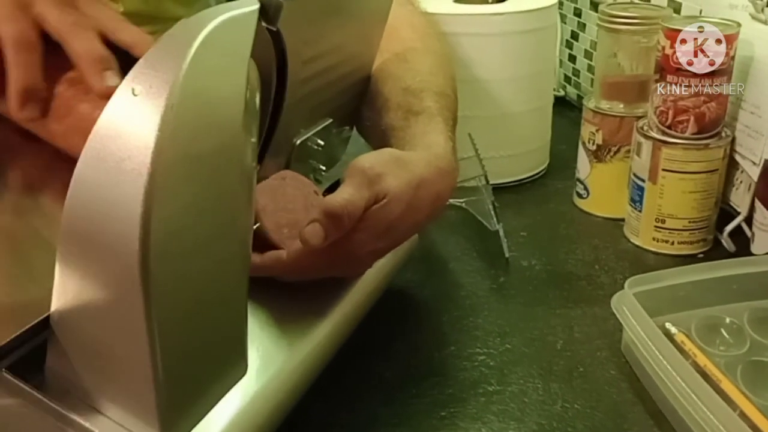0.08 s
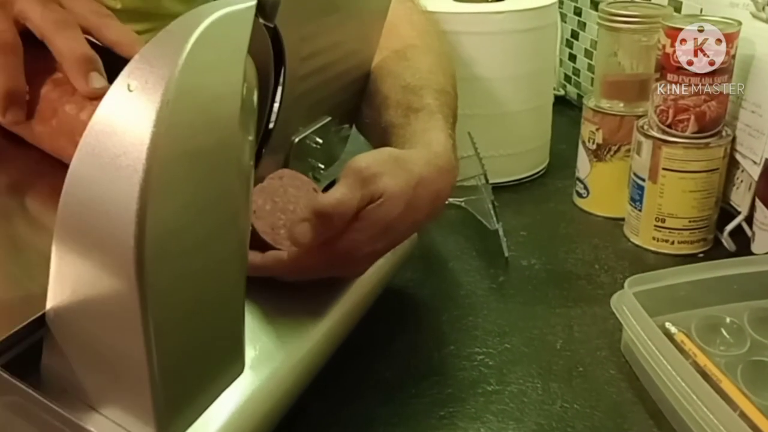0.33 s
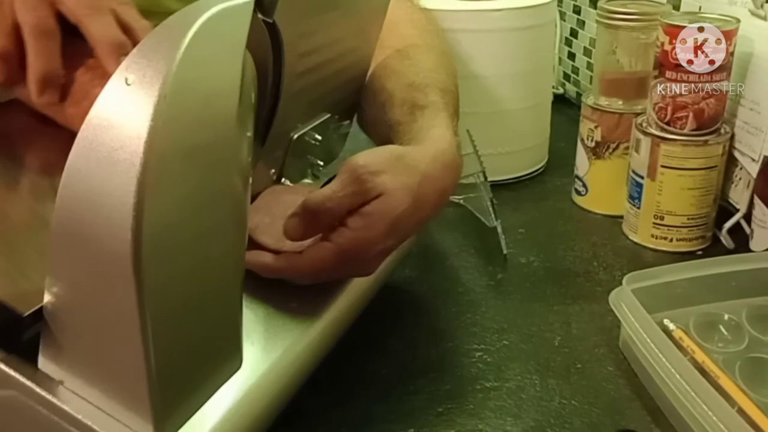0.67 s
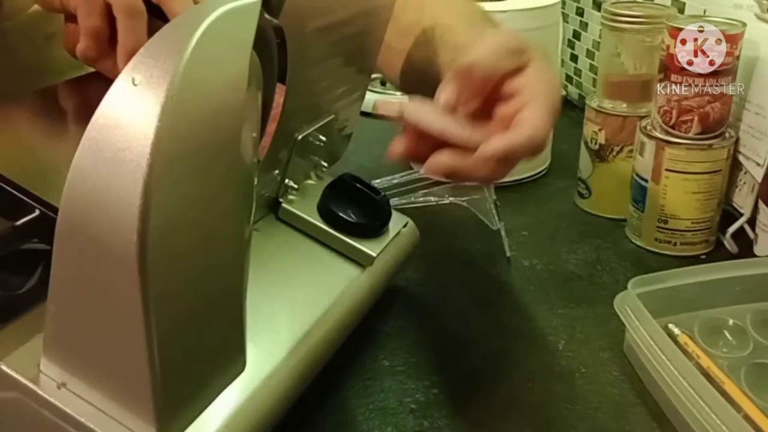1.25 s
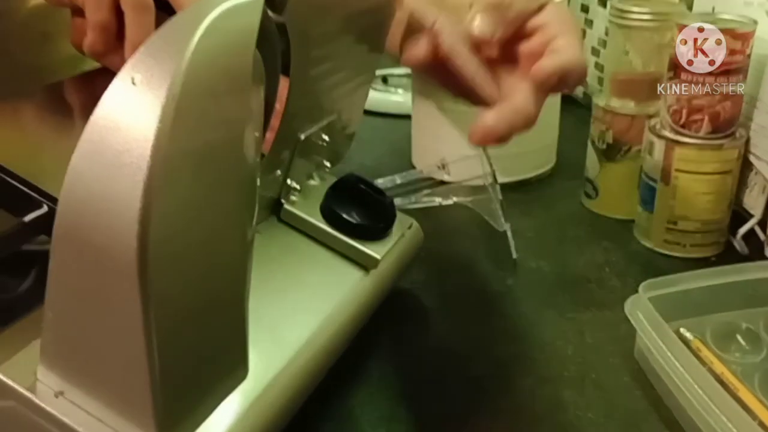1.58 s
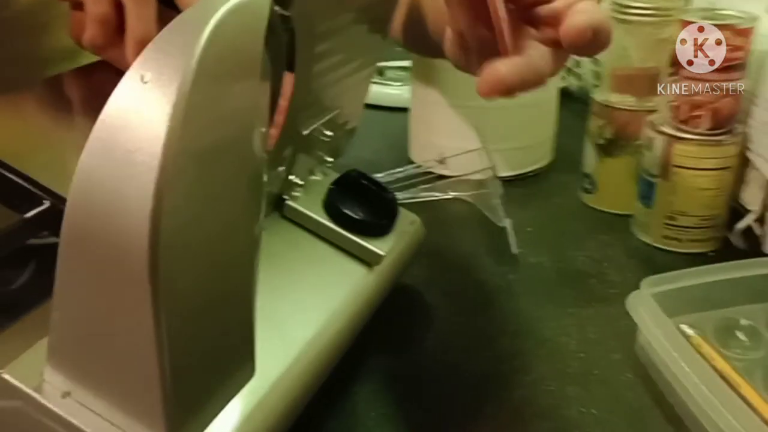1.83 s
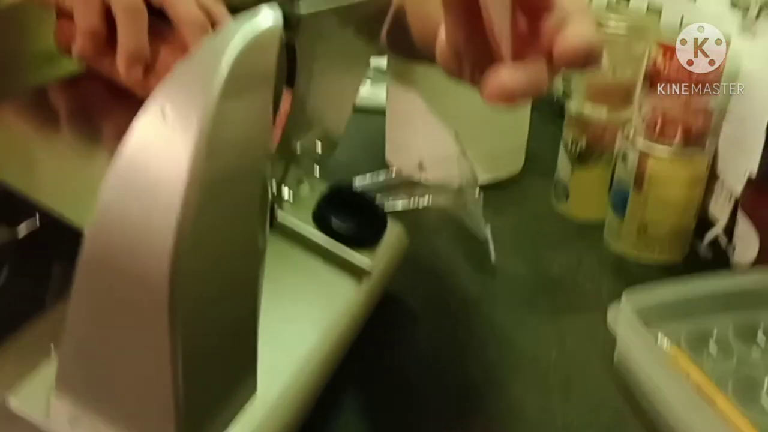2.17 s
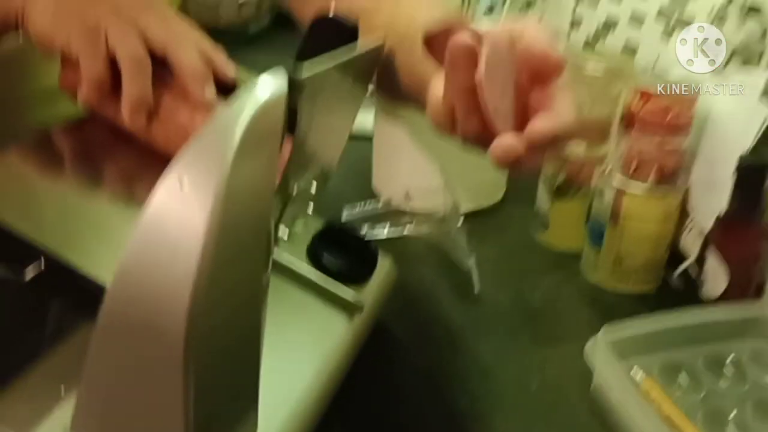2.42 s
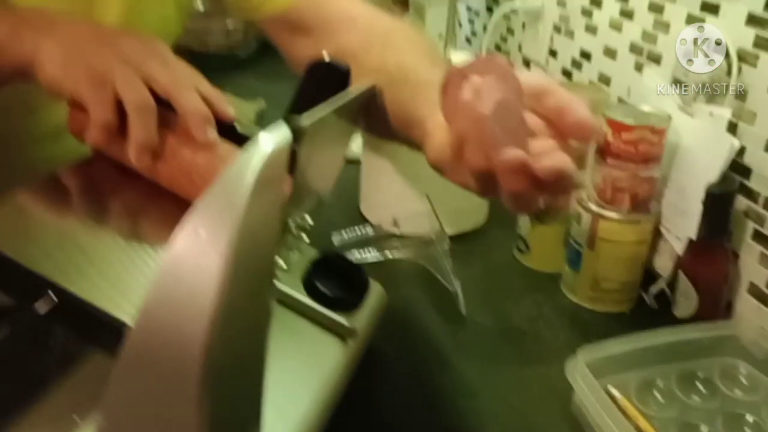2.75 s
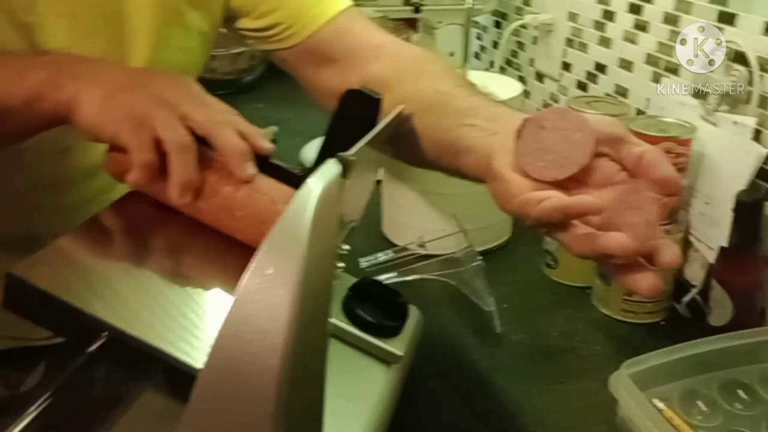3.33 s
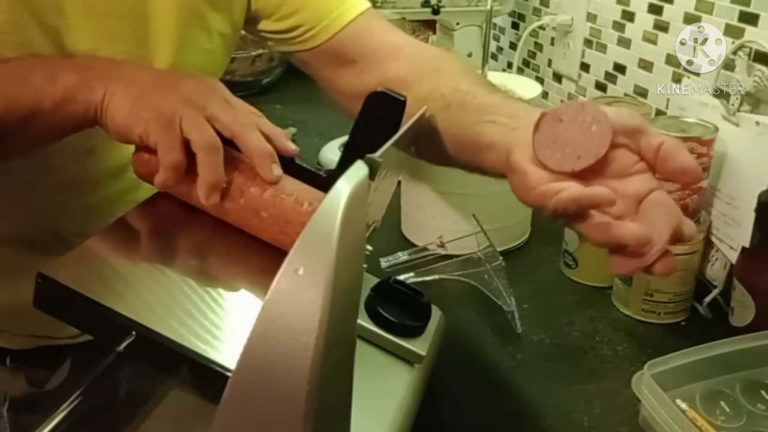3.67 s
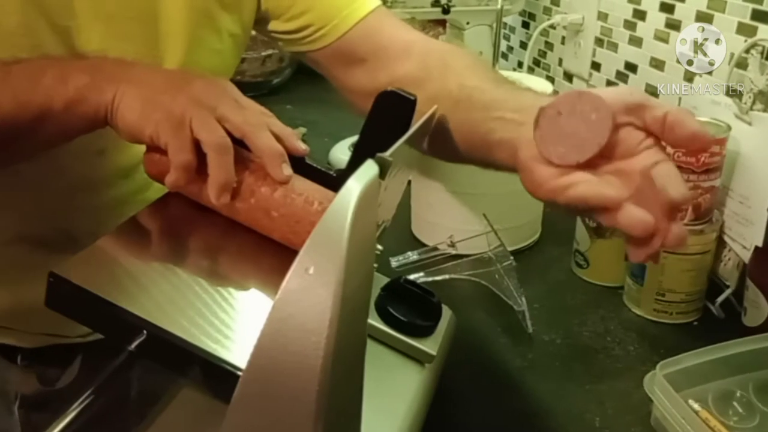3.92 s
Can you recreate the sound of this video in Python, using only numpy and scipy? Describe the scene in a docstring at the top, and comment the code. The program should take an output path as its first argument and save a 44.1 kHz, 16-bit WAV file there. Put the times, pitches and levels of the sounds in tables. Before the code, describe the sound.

An electric meat slicer is already running close by, with a buzzing motor whine, droning, rattling gears and a hissing, ringing blade. During the first second it cuts a slice of sausage, and the motor drags with a stronger hum. Its pitch rises slightly as it runs free. The sound cuts out for an instant at about 1.2 seconds, then the slicer whines on steadily until 4 seconds.

```python
"""An electric meat slicer on a kitchen counter, heard from close by through one microphone.
It is already running: the fast motor whines and buzzes with the mains, the gearing drones and rattles,
the spinning blade hisses and rings. During the first second a slice of sausage is cut, and the motor
drags and hums, then speeds up as it runs free. At 1.2 s the sound cuts out very briefly; after that
the machine whines on to the end."""
import sys
import numpy as np
from scipy import signal
from scipy.fft import rfft, irfft
from scipy.io import wavfile
from scipy.ndimage import map_coordinates

SR = 44100
rng = np.random.default_rng(int(sys.argv[2]) if len(sys.argv) > 2 else 0)


def generate_wav(signal):
    """Clip the signal to [-1, 1] and save it as 16-bit WAV at the path in sys.argv[1]."""
    frames = np.transpose(np.atleast_2d(signal))
    scaled = np.clip(frames, -1, 1) * 32767
    pcm = np.round(scaled).astype(np.int16)
    wavfile.write(sys.argv[1], SR, pcm)


N = 176400
TIME_S = np.arange(N) / SR
MAINS_HZ, GEAR_RATIO = 60, 40
# slow cycles of the drive: motor_turns_per_cycle, one_swell_at_s
BEAT_CYCLE, GEAR_CYCLE, BLADE_CYCLE = (83.06, 2.565), (40.16, 2.503), (251, 2.93)


def from_db(db):
    """Decibels to gain."""
    return 10 ** (np.asarray(db) / 20)


def in_time(rows):
    """A curve's value at every sample."""
    return np.interp(TIME_S, *np.transpose(rows))


def drift(rate_hz):
    """Smooth random wander of spread 1."""
    pole = np.exp(-80 * np.pi * rate_hz / SR)
    slow = signal.lfilter([1], [1, -2 * pole, pole * pole], rng.standard_normal(N // 40 + 2002))[2000:]
    return np.interp(np.arange(N) / 40, np.arange(len(slow)), slow / slow.std())


def tone(cycles):
    """A sine of rms 1 that follows a running count of cycles."""
    return np.sqrt(2) * np.sin(2 * np.pi * (cycles + rng.random()))


def beating(cycles, beats, partner_gain):
    """A sine of rms 1 and a close neighbour that beats against it."""
    phase = 2 * np.pi * (cycles + rng.random())
    return np.sqrt(2) * (np.sin(phase) + partner_gain * np.sin(phase + 2 * np.pi * beats))


def cycle(turns, rule):
    """Running count of a slow cycle; whole numbers fall on its swells."""
    length, swell_s = rule
    return (turns - turns[int(swell_s * SR)]) / length


def chug(turns):
    """Gain that swells by 1 dB with each turn of the gear wheel and of the blade."""
    return from_db(sum(np.cos(2 * np.pi * cycle(turns, rule)) for rule in (GEAR_CYCLE, BLADE_CYCLE)))


def mains_pulse():
    """Swing of the motor's force, twice per mains cycle."""
    return np.cos(2 * np.pi * 2 * MAINS_HZ * TIME_S)


def colour(white, spectrum, ripple_db=2.2, ripple_width_hz=14):
    """Shapes white noise into a steep-sided band, with close-set peaks and dips from housing and counter."""
    hz, db = np.transpose(spectrum)
    f = np.maximum(np.arange(N // 2 + 1) * SR / N, 1)
    edges = 1 / np.sqrt((1 + (hz[0] / f) ** 30) * (1 + (f / hz[-1]) ** 30))
    ripple = np.interp(f / ripple_width_hz, np.arange(4000), rng.standard_normal(4000))
    shape_db = np.interp(np.log(f), np.log(hz), db) + ripple_db * ripple * np.minimum(f / 2000, 1)
    return irfft(rfft(white) * edges * from_db(shape_db) * np.sqrt(SR / 2), N)


def friction(turns, spectrum, gain, repeat, rotor_depth, mains_depth, flutter_db):
    """Rubbing noise, pulsed by rotor and mains; a share repeats every second turn of the gear wheel."""
    place = turns / turns[-1] * N
    loop_size = int(2 * GEAR_RATIO * N / turns[-1])
    worn = map_coordinates(rng.standard_normal(loop_size), [place % loop_size], order=3, mode="grid-wrap")
    noise = np.sqrt(repeat) * worn + np.sqrt(1 - repeat) * rng.standard_normal(N)
    rotor = .5 * np.cos(2 * np.pi * turns) + np.cos(2 * np.pi * 2 * turns)
    noise *= (1 + rotor_depth * rotor + mains_depth * mains_pulse()) * from_db(flutter_db * drift(30))
    return colour(noise / noise.std(), spectrum) * from_db(in_time(gain))


# colour of the housing's rumble: frequency_hz, density_db
RUMBLE_SPECTRUM = [(25, -90.3), (45, -86), (85, -83.5), (110, -83), (165, -75), (210, -67.5), (290, -65),
                   (350, -71.5), (400, -68), (450, -68.5), (560, -69.5), (680, -74), (770, -68), (880, -77),
                   (1100, -67.5)]
# its rise and fall: time_s, gain_db
RUMBLE_GAIN = [(0, -2), (0.1, 1.5), (0.35, -0.7), (0.6, -0.5), (0.85, 1.5), (1.3, 0.4), (1.9, -0.1),
               (2.2, -0.4), (2.7, -0.6), (3, 0), (3.3, -0.5), (3.6, 0.2), (4, 0.3)]
def housing_rumble(turns):
    """The housing rumbles on the counter, chugging with gear wheel and blade."""
    return chug(turns) * friction(turns, RUMBLE_SPECTRUM, RUMBLE_GAIN,
                                  repeat=0.27, rotor_depth=0.095, mains_depth=0.06, flutter_db=1.5)


# colour of the gear rattle: frequency_hz, density_db
RATTLE_SPECTRUM = [(1100, -73.5), (1400, -70), (1680, -69), (1900, -69.5), (2150, -70.5), (2650, -67),
                   (2900, -72), (3300, -71), (3700, -66.5), (4100, -68), (4500, -68.5), (4800, -74)]
# its rise and fall: time_s, gain_db
RATTLE_GAIN = [(0, -3), (0.1, -1.4), (0.35, -1.1), (0.6, -0.33), (0.85, -1.9), (1.3, -1.7), (1.9, -0.63),
               (2.2, -1.7), (2.7, -1.2), (3, -0.47), (3.3, 0.39), (3.6, 1.6), (4, 1.9)]
def gear_rattle(turns):
    """The gears rub and rattle in the upper midrange."""
    return friction(turns, RATTLE_SPECTRUM, RATTLE_GAIN,
                    repeat=0.31, rotor_depth=0.083, mains_depth=0.033, flutter_db=0.77)


# colours of the blade's hiss and of its top treble: frequency_hz, density_db
HISS_SPECTRUM = [(4800, -72.5), (5400, -69.5), (5800, -73), (6300, -69.5), (6650, -68.5), (6900, -70.5),
                 (7150, -69), (7500, -77), (8400, -78), (9000, -75)]
SHEEN_SPECTRUM = [(9000, -79.5), (9600, -72.5), (10200, -69.5), (11000, -71.5), (11600, -78), (12200, -78),
                  (12700, -85), (13800, -92), (14700, -75), (15500, -82)]
# their rise and fall: time_s, gain_db
HISS_GAIN = [(0, 0.66), (0.1, 0.46), (0.35, 0.6), (0.6, 1), (0.85, 0.42), (1.3, 1.7), (1.9, 1.4),
             (2.2, -0.38), (2.7, 0.045), (3, -1.2), (3.3, -1.9), (3.6, -2.1), (4, -0.53)]
SHEEN_GAIN = [(0, -2.4), (0.1, -1), (0.35, -0.5), (0.6, -0.3), (0.85, 0.5), (1.3, 1.2), (1.9, 1.0),
              (2.2, 0.3), (2.7, -1), (3, 0), (3.3, 0.1), (3.6, -1), (4, -1)]
def blade_hiss(turns):
    """The spinning blade rubs: a hiss with a bright sheen above it."""
    hiss = friction(turns, HISS_SPECTRUM, HISS_GAIN,
                    repeat=.2, rotor_depth=0.34, mains_depth=0.02, flutter_db=0.44)
    sheen = friction(turns, SHEEN_SPECTRUM, SHEEN_GAIN,
                     repeat=0.19, rotor_depth=0.13, mains_depth=0.038, flutter_db=0.8)
    return hiss + sheen


# resonances of blade and housing: pitch_hz, width_hz
RESONANCES = [(1760, 330), (3720, 136), (4100, 580), (6640, 180), (7760, 310), (10050, 370)]
# one curve for each resonance: time_s, level_db
RESONANCE_LEVELS = [
    [(0, -50), (.8, -57), (1, -48), (2, -50), (2.7, -42), (3.3, -40), (4, -40)],
    [(0, -50), (.15, -40.5), (.55, -40.5), (1.25, -36.5), (2, -41.5), (2.8, -42), (4, -54)],
    [(0, -46), (.3, -42), (.9, -43.5), (1.2, -48), (1.55, -39.5), (2.3, -45), (4, -54)],
    [(0, -40), (.13, -41), (.3, -47), (1.4, -51), (2.1, -45), (2.45, -54), (2.8, -41), (3.1, -56), (4, -49)],
    [(0, -48), (.5, -46), (1.1, -51.5), (2.2, -53), (4, -58)],
    [(0, -58), (1.7, -45), (2, -45), (2.4, -39), (2.75, -42), (3, -54), (4, -58)],
]
def blade_rings():
    """Rubbing keeps the resonances of blade and housing singing, each coming and going."""
    out = 0
    for (hz, width_hz), level in zip(RESONANCES, RESONANCE_LEVELS):
        band = signal.butter(2, [hz - width_hz / 2, hz + width_hz / 2], "band", fs=SR, output="sos")
        ring = signal.sosfilt(band, rng.standard_normal(N))
        out += ring / ring.std() * from_db(in_time(level))
    return out


# low throb of the gear wheel: time_s, level_db
THROB_LEVEL = [(0, -45), (.13, -42), (.26, -49.5), (.6, -48), (1.2, -53.5), (1.8, -49.5), (2.3, -52.5),
               (3.3, -50), (4, -51.5)]
# load of the cut on the blade: time_s, load_share
CUT_LOAD = [(0, .3), (.25, 1), (.85, 0.84), (1.15, 0), (4, 0.2)]
# tones of the teeth: wheel_multiple (rounded when played), level_db, full_load_change_db
TOOTH_TONES = [(14, -65.5, -13), (17, -55, -5.5), (20, -54, -5), (22, -45, 0.5), (24, -50.5, -9),
               (29, -53, -0.5), (32, -50.5, 3.5), (33, -54, 12), (59, -55.5, -4), (126, -59, -17),
               (130.7, -48.5, -9), (209, -51, 0), (329, -51.5, -4)]
def gear_drone(turns):
    """The gear wheel throbs once per turn; its uneven teeth give tones that change level under load."""
    wheel, load = cycle(turns, GEAR_CYCLE), in_time(CUT_LOAD)
    throb_level = from_db(in_time(THROB_LEVEL) + 1.83 * drift(5.2))
    throb = throb_level * beating(10.06 * wheel, wheel, partner_gain=from_db(-1.5))
    teeth = 0
    for multiple, db, load_db in TOOTH_TONES:
        level = from_db(db + load_db * load + 1.83 * drift(2.9))
        teeth += level * tone(round(multiple) * turns / GEAR_RATIO)
    return throb + teeth * chug(turns)


# hum at the motor's turning rate, strongest under load: time_s, level_db
HUM_LEVEL = [(0, -46), (0.08, -52), (0.13, -34), (0.18, -39), (0.23, -34), (0.45, -30.7), (0.65, -33.5),
             (0.9, -31.5), (1.02, -36.1), (1.12, -44), (1.5, -51), (2, -58), (2.5, -51), (3, -43.5),
             (3.3, -41), (4, -38.5)]
# a tone just below the hum: time_s, level_db
HUM_PARTNER_LEVEL = [(0, -50), (.7, -74), (1.1, -46.5), (2, -50), (2.7, -47), (3.3, -44.5), (4, -48)]
def motor_hum(turns):
    """The rotor's hum beats against a slightly lower tone, over a faint mains hum and its octave."""
    hum_db, mains = in_time(HUM_LEVEL), MAINS_HZ * TIME_S
    partner_gain = from_db(in_time(HUM_PARTNER_LEVEL) - hum_db)
    hum = from_db(hum_db) * beating(turns, -cycle(turns, BEAT_CYCLE), partner_gain)
    return hum + from_db(-64.5) * tone(mains) + from_db(-57.5) * tone(2 * mains)


# thin whistle of the motor: time_s, level_db
WHISTLE_LEVEL = [(0, -39.5), (0.3, -43.7), (0.7, -50), (1.05, -41.5), (1.45, -50), (1.85, -44), (2.3, -46),
                 (2.9, -54), (3.3, -51.5), (3.55, -45), (4, -54)]
def motor_whistle(turns):
    """A whistle at 16 times the turning rate, pulsing with the motor's force."""
    return from_db(in_time(WHISTLE_LEVEL)) * (1 + .25 * mains_pulse()) * tone(16 * turns)


# swings of the whine and of its upper partials, opening up as the motor runs free: time_s, gain_db
WHINE_SWING = [(0, -4.5), (.4, -5), (.8, -6.5), (.95, 2), (1.1, 1.5), (1.5, 3), (2.05, -1), (2.35, 2.5),
               (2.8, 1), (3.3, 1.5), (4, 3.5)]
UPPER_SWING = [(0, -8), (.8, -4), (1.2, -4), (2, -3.5), (2.4, 0.5), (2.75, 3), (3.2, 3), (3.6, 2), (4, 1)]
# rotor overtones: rotor_multiple, level_db, whine_weight, upper_weight, growth_db_per_s
ROTOR_OVERTONES = [(2, -49.5, 0.26, 0, 1.7), (3, -40, 1.14, 0.13, 0), (4, -50.5, 0.25, 0, 1),
                   (5, -47, .5, 0, 2.5), (6, -43.5, 0.54, 0.54, 0), (7, -44, 0, 1.3, 0.5),
                   (8, -45, 0, 0, -1.5), (9, -43.5, 0, 0.66, 0), (10, -60, .5, 0, 0),
                   (12, -47.5, 0.58, 0.26, -2.5), (14, -50.5, 0, 0.14, -1), (18, -51.5, 0, 0, -.5),
                   (20, -56, .3, 0, -2), (24, -60, .3, 0, -.5), (30, -58, 0, 0, -1)]
def motor_whine(turns, flutter_db=1.65, buzz_depth=0.29, roughness=0.28):
    """The rough overtones of the rotor, each buzzing with mains sidebands."""
    whine_db, upper_db = in_time(WHINE_SWING), in_time(UPPER_SWING)
    out = 0
    for multiple, db, whine_weight, upper_weight, growth in ROTOR_OVERTONES:
        swing_db = whine_weight * whine_db + upper_weight * upper_db + growth * (TIME_S - TIME_S.mean())
        level = from_db(db + swing_db + flutter_db * drift(7.6))
        buzz = 1 + buzz_depth * tone(2 * MAINS_HZ * TIME_S) + roughness * drift(73)
        out += level * buzz * tone(multiple * turns)
    return out


# motor speed, held down by the cut at first: time_s, turns_per_s
MOTOR_SPEED = [(0, 473.8), (0.3, 486.1), (0.6, 494.4), (0.8, 495.8), (0.95, 499.9), (1.1, 505.5),
               (1.4, 508.5), (1.6, 508.2), (1.85, 510.7), (2.05, 509.0), (2.35, 510.5), (2.6, 509.1),
               (2.8, 511.0), (3.05, 510.0), (3.3, 512.6), (3.55, 511.3), (3.8, 513.4), (4, 512.4)]
def scene():
    """The whole slicer at close range, driven by one slightly jittering motor; both channels alike."""
    turns = np.cumsum(in_time(MOTOR_SPEED) * (1 + 0.000493 * drift(8.26))) / SR
    rubbing = housing_rumble(turns) + gear_rattle(turns) + blade_hiss(turns)
    motor = motor_hum(turns) + motor_whistle(turns) + motor_whine(turns)
    slicer = rubbing + motor + gear_drone(turns) + blade_rings()
    return np.array([slicer, slicer])


def record(dry):
    """The sound cuts out for a moment, and the treble ends at 15.6 kHz."""
    start_s, end_s, drop_db, fade_db_per_s = 1.190, 1.2364, -34, 1000
    in_gap = (TIME_S > start_s) & (TIME_S < end_s)
    gap_db = np.where(in_gap, drop_db - fade_db_per_s * (TIME_S - start_s), 0)
    lowpass = signal.ellip(12, .1, 90, 15600, fs=SR, output="sos")
    return signal.sosfilt(lowpass, dry * from_db(gap_db))


dry = scene()
out = record(dry)
generate_wav(out)
```